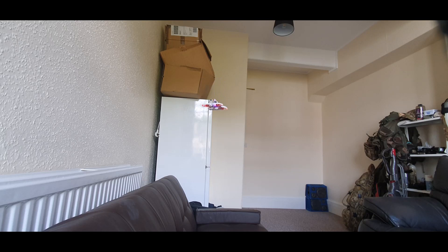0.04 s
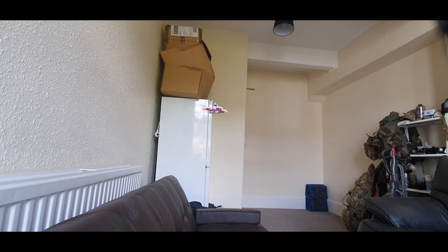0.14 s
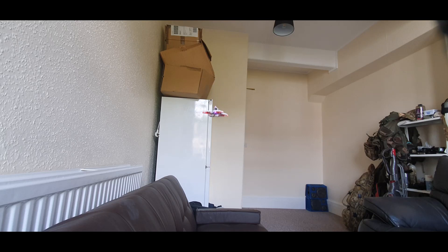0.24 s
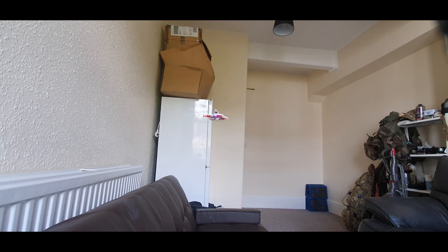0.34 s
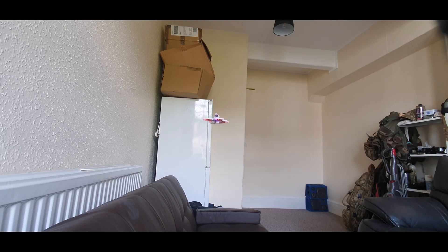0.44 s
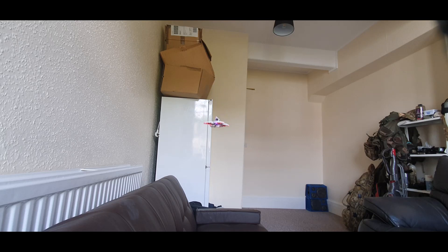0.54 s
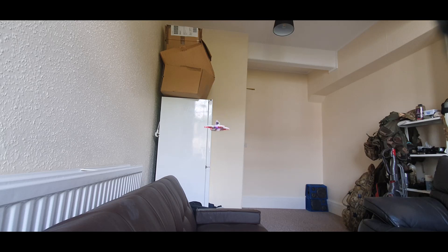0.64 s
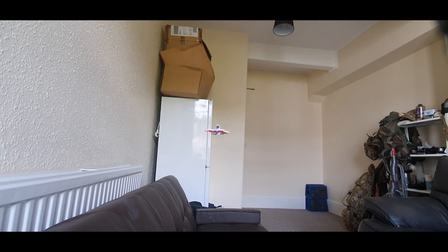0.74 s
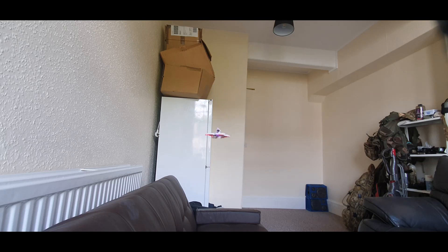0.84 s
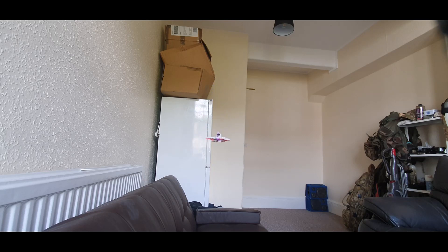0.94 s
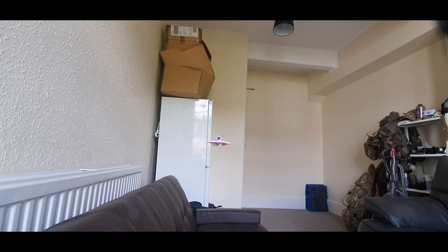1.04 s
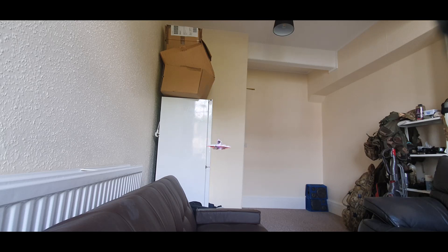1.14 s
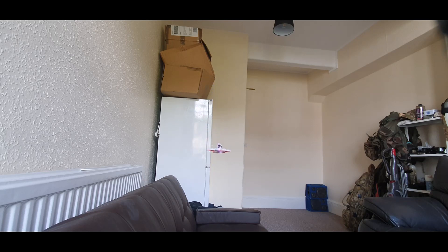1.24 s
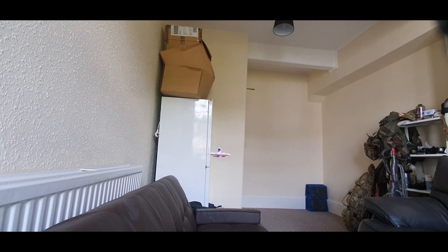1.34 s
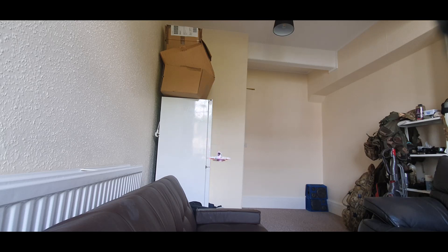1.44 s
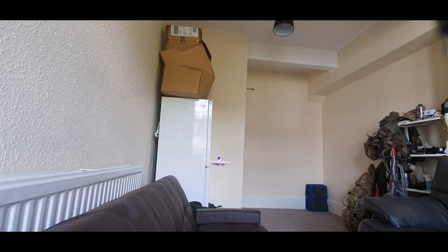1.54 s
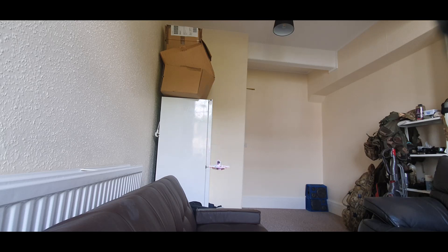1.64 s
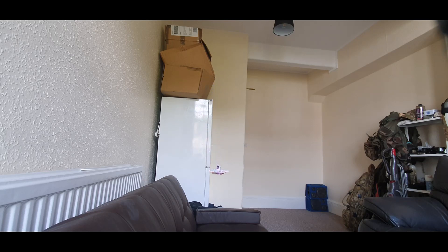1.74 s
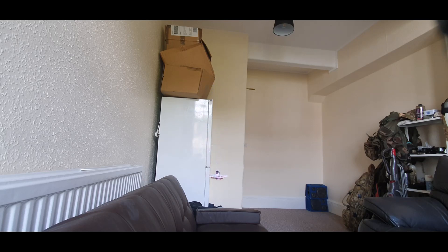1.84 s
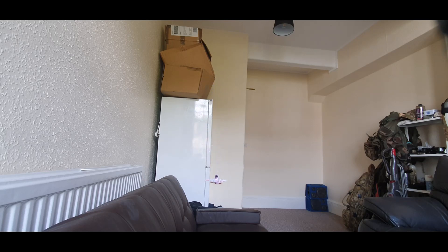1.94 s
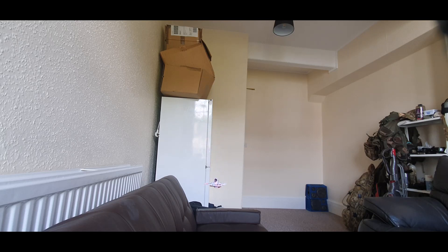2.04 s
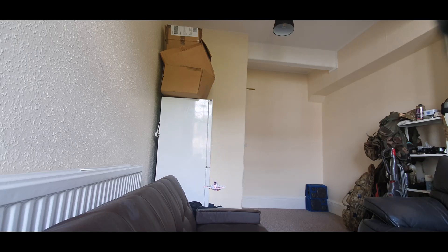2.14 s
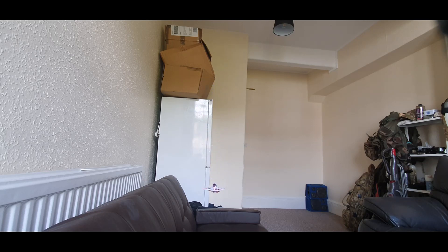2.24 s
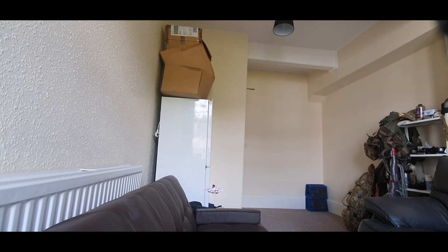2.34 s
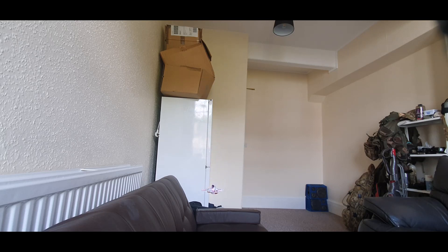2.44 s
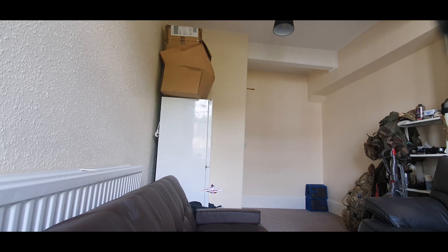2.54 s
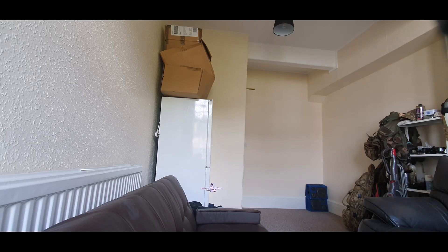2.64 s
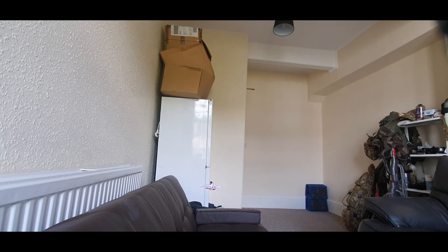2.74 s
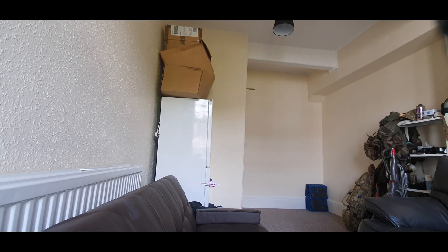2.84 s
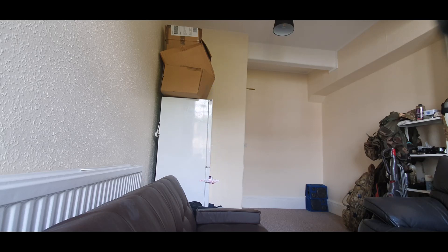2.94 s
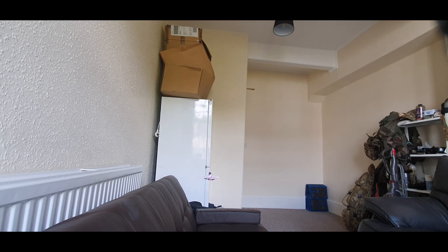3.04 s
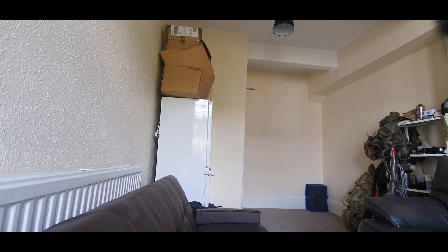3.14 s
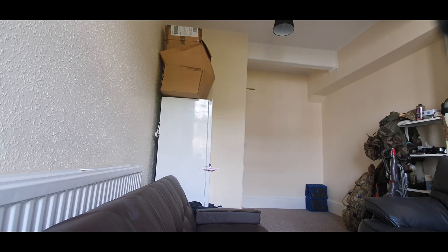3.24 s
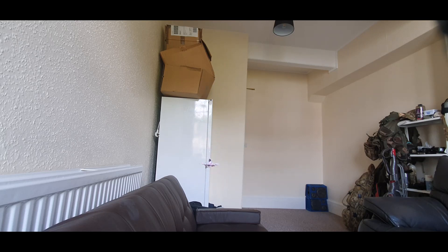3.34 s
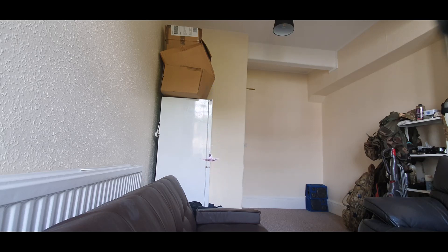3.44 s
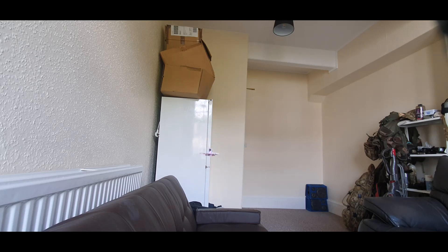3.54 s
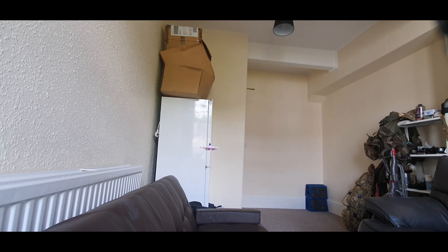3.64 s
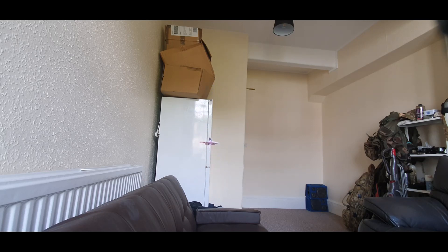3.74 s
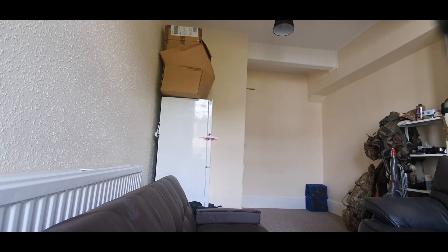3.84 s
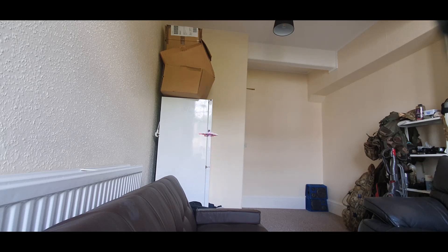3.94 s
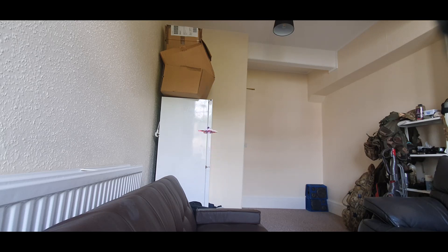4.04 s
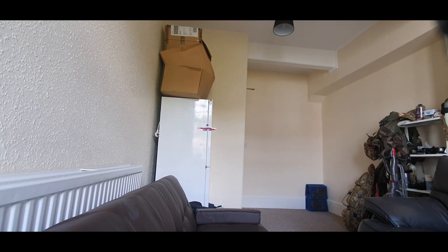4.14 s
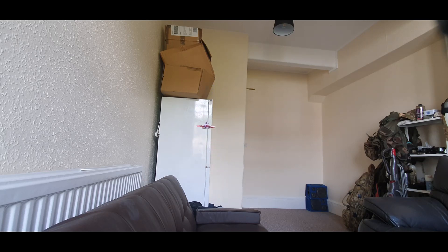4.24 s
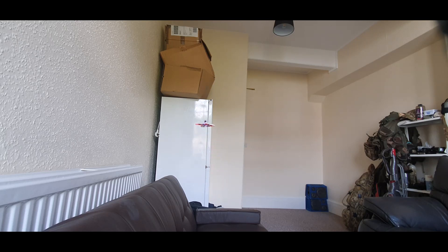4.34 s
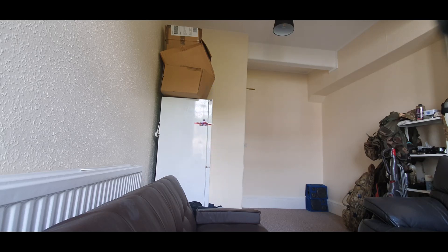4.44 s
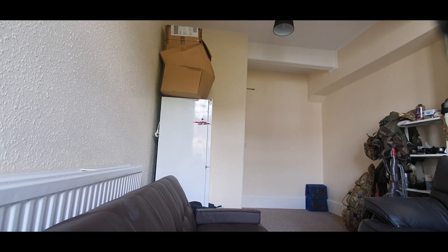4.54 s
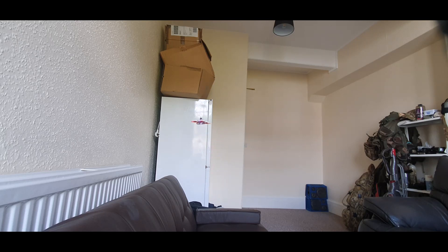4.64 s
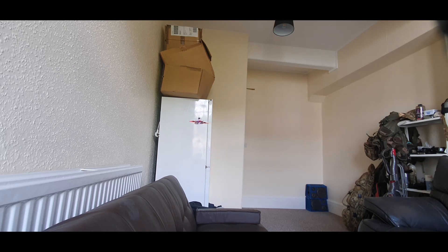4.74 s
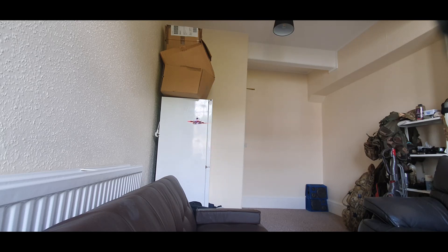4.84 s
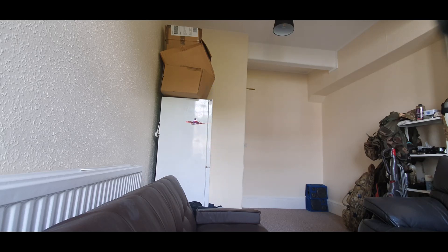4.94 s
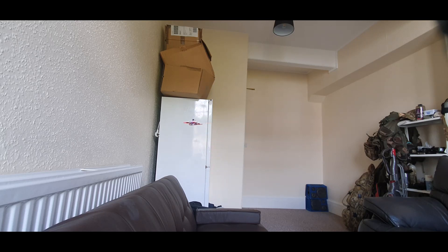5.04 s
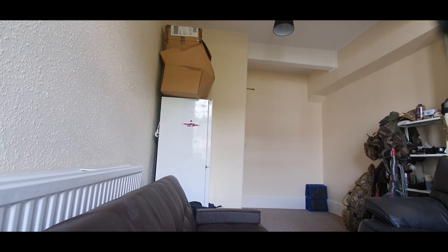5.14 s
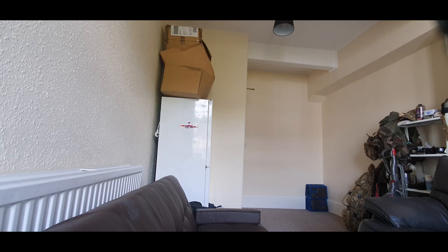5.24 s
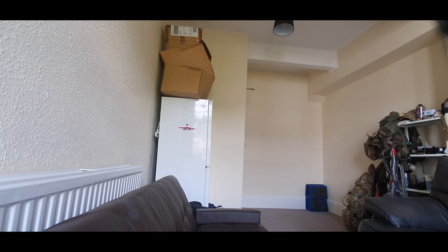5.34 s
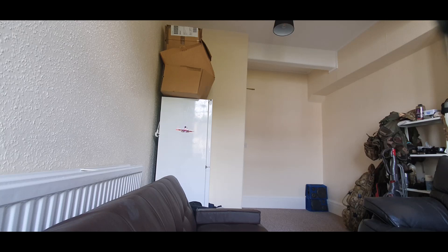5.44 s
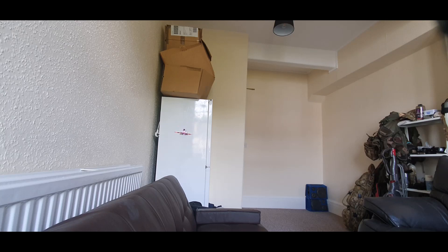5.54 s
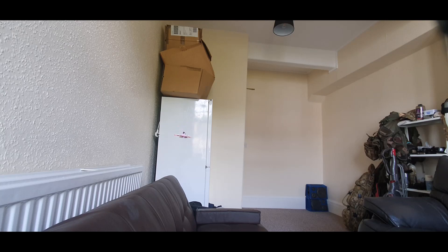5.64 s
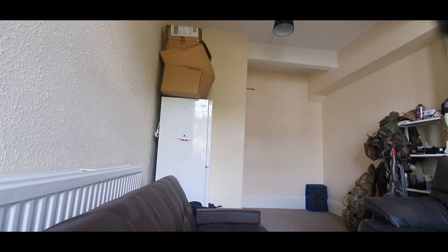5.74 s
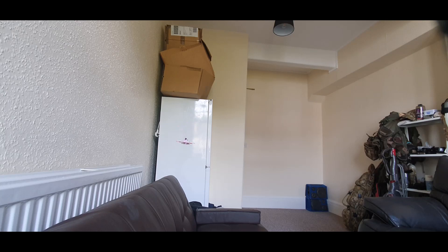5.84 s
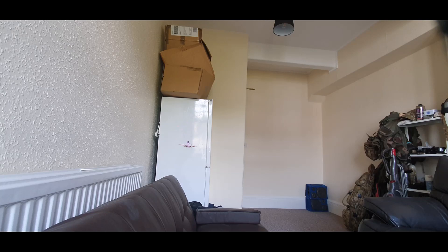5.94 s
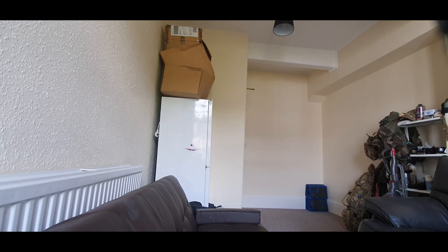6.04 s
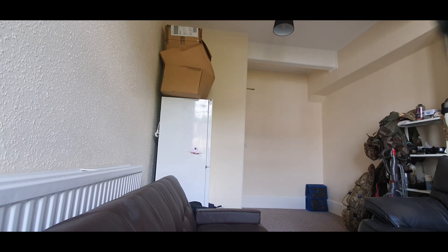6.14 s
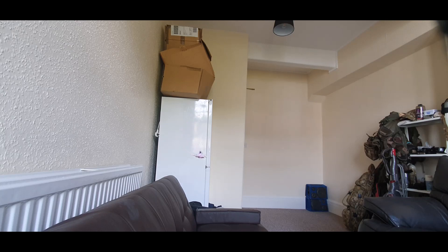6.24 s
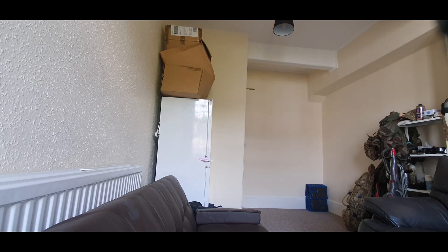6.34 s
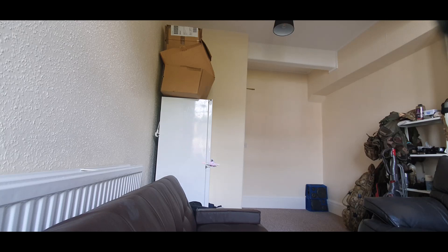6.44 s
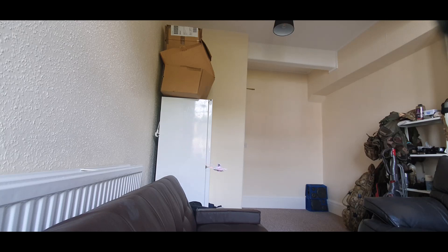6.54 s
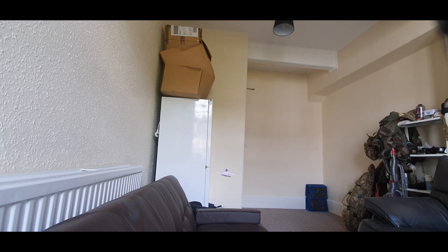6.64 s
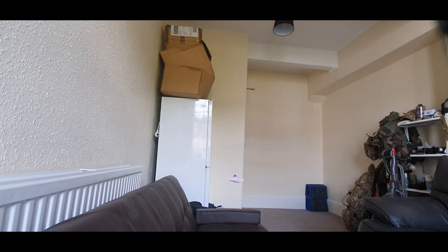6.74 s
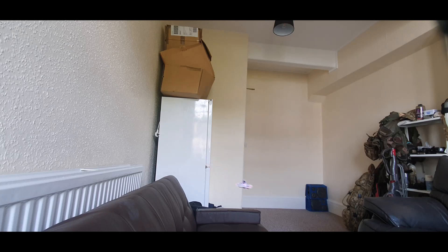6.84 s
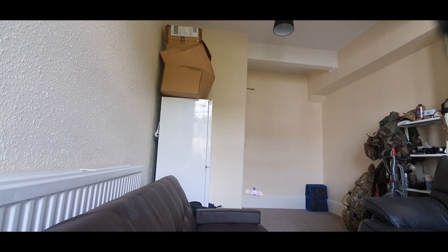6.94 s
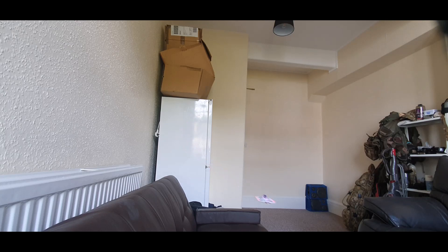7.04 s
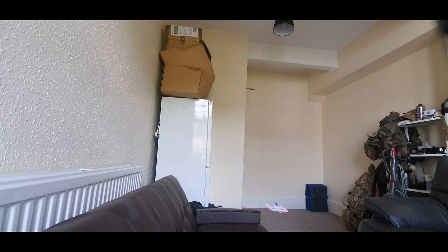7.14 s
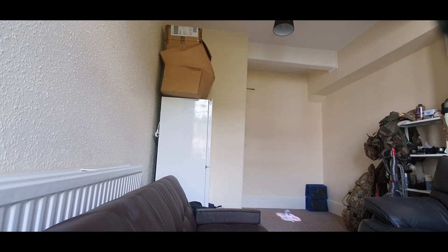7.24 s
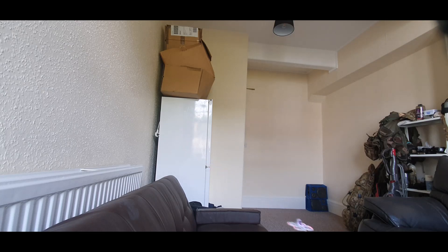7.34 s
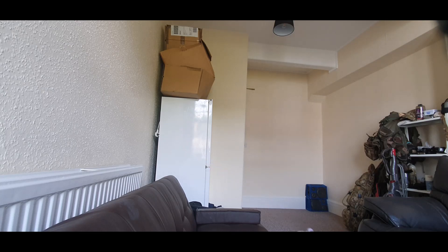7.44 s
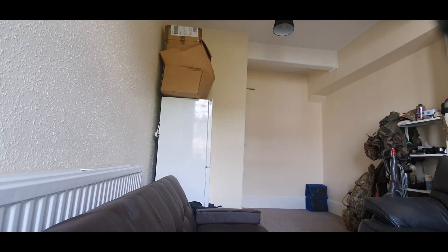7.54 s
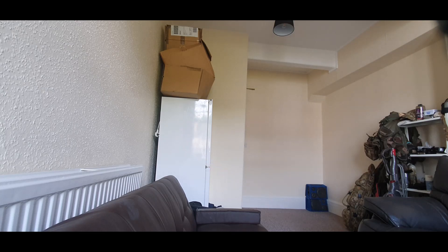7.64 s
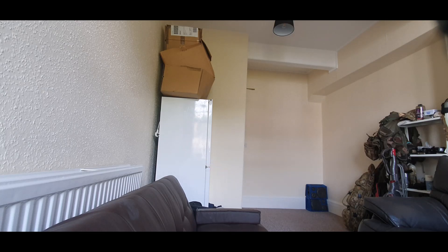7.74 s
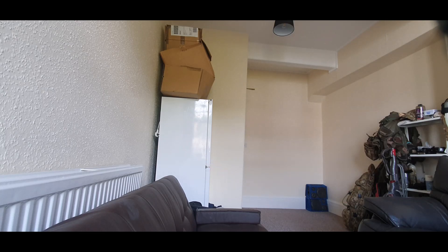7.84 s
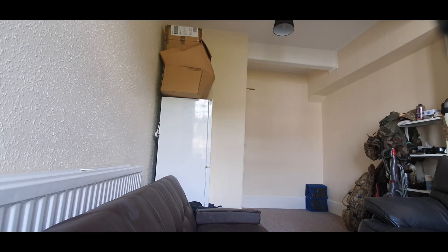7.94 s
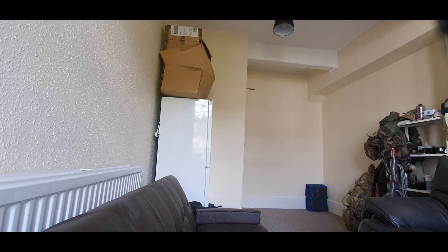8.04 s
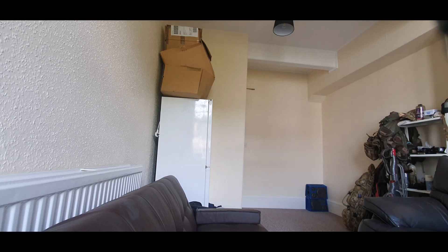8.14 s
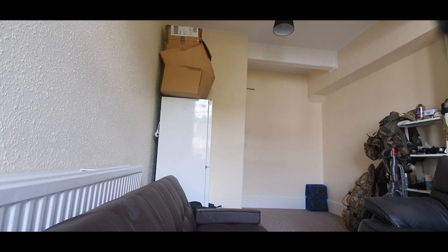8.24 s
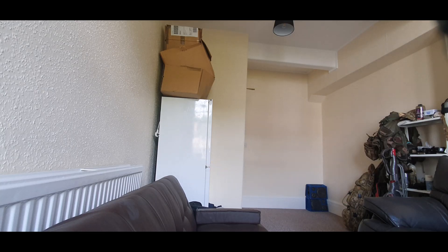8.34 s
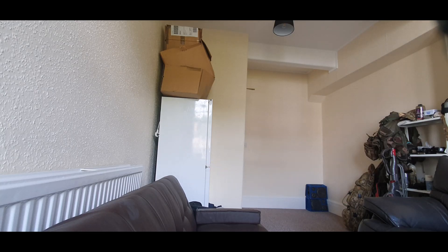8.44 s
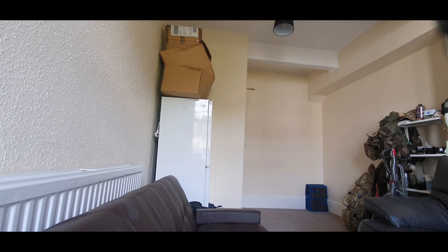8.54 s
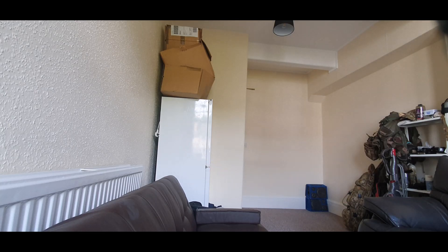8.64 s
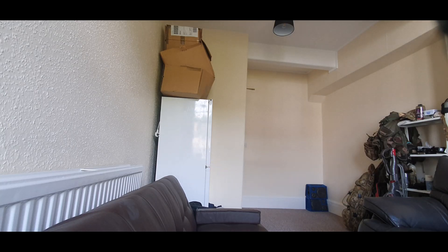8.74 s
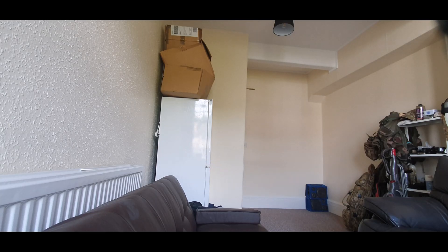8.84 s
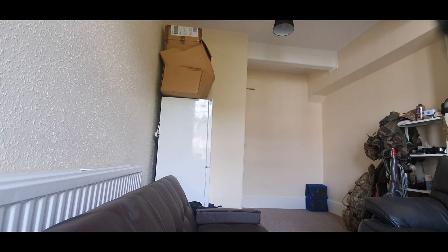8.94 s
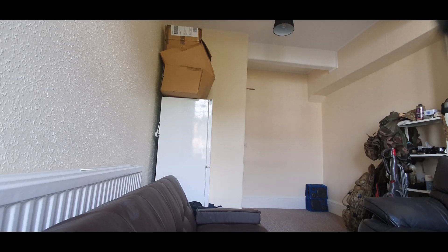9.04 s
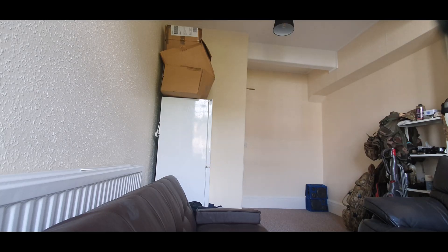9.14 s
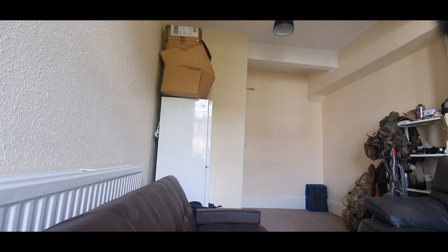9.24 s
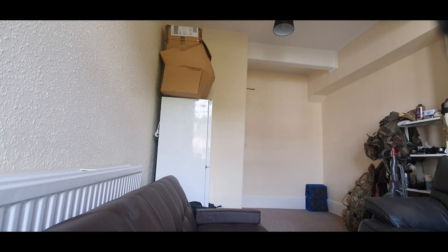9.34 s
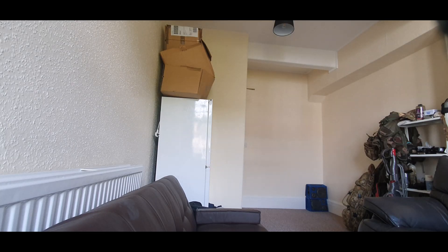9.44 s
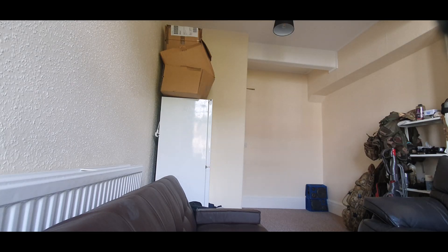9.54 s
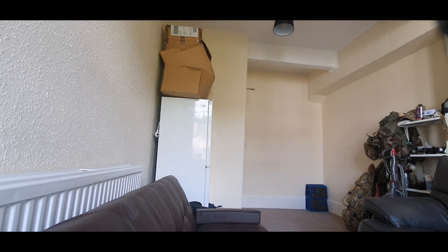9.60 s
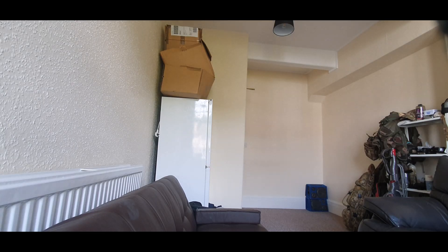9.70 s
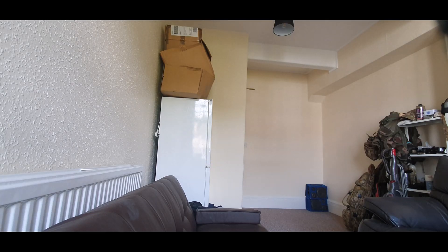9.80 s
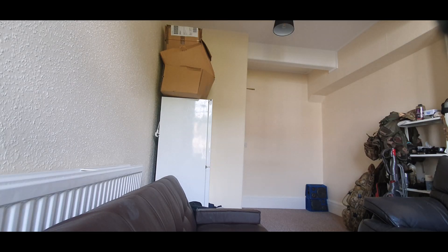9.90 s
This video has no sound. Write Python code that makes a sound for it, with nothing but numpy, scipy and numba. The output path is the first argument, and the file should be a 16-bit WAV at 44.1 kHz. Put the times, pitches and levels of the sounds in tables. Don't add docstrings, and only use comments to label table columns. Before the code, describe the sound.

Buzzing, wavering whine of a small hovering drone with airy hiss, cut off by a soft landing thud, blade scrubbing and a plastic click.

```python
import sys
import numpy as np
from scipy import signal
from scipy.fft import rfft, irfft, next_fast_len
from scipy.io import wavfile
from scipy.ndimage import uniform_filter1d
from numba import njit

SR = 44100
rng = np.random.default_rng(int(sys.argv[2]) if len(sys.argv) > 2 else 0)


def unload_wav(signal):
    wavfile.write(
        sys.argv[1],
        SR,
        np.round(np.clip(np.atleast_2d(signal).T, -1, 1) * 32767).astype(np.int16),
    )


def to_linear_factor(level_db):
    exponent = np.asarray(level_db, float) / 20
    return 10 ** exponent


N = 439677
TIME = np.arange(N) / SR
BLOCK = 64
COARSE_TIME = np.arange(N // BLOCK + 1) * BLOCK / SR
CUT_S = 8.5

# time in seconds, level in dB.
AIR_LEVEL = [
    (0, -32),
    (1.55, -33.5),
    (3.4, -32.5),
    (4.35, -34),
    (7.45, -33),
    (8.5, -35),
    (8.6, -35.5),
    (8.69, -40),
]


def curve(rows, t=TIME, fade_db=600):
    s, db = np.transpose(rows)[:2]
    outside_s = np.maximum(s[0] - t, 0) + np.maximum(t - s[-1], 0)
    return np.interp(t, s, db) - fade_db * outside_s


def bells(rows, scale, t=TIME):
    return sum(scale(db) * np.exp(-((t - s) / half) ** 2) for s, db, half in rows)


def on_log(hz, points):
    f, db = np.transpose(points)
    return np.interp(np.log(hz + 1), np.log(f), db)


def wander(rate, size, per_s):
    k = max(int(per_s / rate), 1)
    w = uniform_filter1d(uniform_filter1d(rng.standard_normal(size), k), k)
    return w / w.std()


def hiss(points, patchy_db=0., alike_hz=300):
    hz, _, z = signal.stft(rng.standard_normal((2, N)), SR, nperseg=1024)
    share = 1 / (1 + (hz[:, None] / alike_hz) ** 2)
    z[1] = share * z[0] + np.sqrt(1 - share ** 2) * z[1]
    patch = uniform_filter1d(wander(12, z.shape, SR / 512), size=24, axis=1)
    z = z * to_linear_factor(on_log(hz, points)[:, None] + patchy_db * patch / patch.std())
    x = signal.istft(z, SR, nperseg=1024)[1][:, :N]
    return x / x.std()


def narrow(hz, width_hz):
    edges = [hz - width_hz / 2, hz + width_hz / 2]
    band = signal.butter(2, edges, "bandpass", fs=SR, output="sos")
    x = signal.sosfilt(band, rng.standard_normal((2, N)))
    return x / x.std()


@njit
def sing(turns, orders, re, im, block):
    out = np.zeros((2, len(turns)))
    for k in range(len(orders)):
        for i in range(len(turns)):
            a = 2 * np.pi * orders[k] * turns[i]
            c, s = np.cos(a), np.sin(a)
            for ear in range(2):
                out[ear, i] += re[k, ear, i // block] * c + im[k, ear, i // block] * s
    return out


def rotor(hz, orders, tones_db, wobble):
    # centre in Hz, width in Hz, peak in dB.
    whine = (11400, 450, 13)
    centre, width, peak_db = whine
    steps, per_s = len(COARSE_TIME), SR / BLOCK
    hunt = .8 * wander(25, steps, per_s) + 1.7 * wander(8, steps, per_s)
    speed = hz * (1 + wobble * np.interp(TIME, COARSE_TIME, hunt))
    turns = (np.cumsum(speed) / SR + rng.random()) % 1
    coarse_hz = np.r_[hz[::BLOCK], hz[-1]][:steps]
    gains = []
    for order, db in zip(orders, tones_db):
        echo = wander(14 + 5 * order, (2, 2, steps), per_s)
        mix = min(.065 * order, .5 + .007 * order)
        slide = min(order / 3, 1.5) ** 1.5 * wander(3, (2, steps), per_s)
        direct = np.exp(1j * slide)
        frame_db = peak_db / (1 + ((order * coarse_hz - centre) / width) ** 2)
        fade_db = (order > 4) * 2.5 * wander(7, steps, per_s)
        path = np.sqrt(1 - mix) * direct + np.sqrt(mix / 2) * (echo[0] + 1j * echo[1])
        gains.append(to_linear_factor(db + frame_db + fade_db) * path)
    gains = np.array(gains)
    return sing(turns, np.array(orders, float), gains.real.copy(), gains.imag.copy(), BLOCK)


def flying_rotors():
    # multiple of the turning speed, level in dB for the fast pair, for the slow pair.
    overtones = [(2, -30, -36), (3, -26, -34), (7, -22, -30), (8, -2.5, -7.5), (10, -15, -22),
                 (12, -8.5, -12), (14, -24, -26), (16, -10, -16), (20, -12, -18), (24, -12, -21),
                 (28, -24, -24), (32, -22, -28), (36, -17, -15)]
    # time in seconds, turning speed in Hz, blade tone in dB.
    fast_a = [(.62, 401.5, -46), (1.125, 387.6, -44), (1.75, 386.5, -41.5), (2.0, 392.3, -38.5),
              (2.3, 388.3, -39.5), (3.05, 391, -39.5), (3.24, 402.7, -36.5), (3.47, 403.6, -38),
              (3.86, 379, -48), (5.0, 387.6, -37), (5.3, 394.8, -47.5), (5.6, 389.3, -37.5),
              (6.25, 399.9, -55), (6.62, 389.4, -48), (6.78, 396.5, -39.5), (7.375, 391.6, -46),
              (7.625, 397.8, -41), (8.0, 383.2, -46.5)]
    fast_b = [(0, 395, -39.5), (.65, 388, -36), (1.001, 379, -47), (1.699, 374.7, -40), (2.15, 388.3, -43),
              (3.05, 391, -44.5), (3.32, 401.6, -41), (3.875, 377.8, -36.5), (4.499, 374.5, -45.5),
              (5.1, 380, -44), (5.501, 390.4, -44.5), (6.0, 386.6, -37), (6.5, 378.2, -42),
              (6.751, 383.4, -42.5), (7.15, 371, -34.5), (7.7, 371, -49), (8.101, 365.8, -46),
              (8.35, 370.5, -49.5)]
    slow_a = [(.25, 316.4, -45), (.75, 321.6, -43.5), (1.701, 348.4, -50.5), (2.251, 361.8, -41),
              (2.6, 358.7, -36.5), (2.95, 358.7, -41.5), (3.281, 341, -43), (3.53, 348.5, -43.5),
              (4.001, 341, -53), (4.65, 342, -46), (5.375, 328.4, -52), (5.949, 329.5, -48),
              (6.52, 342.8, -42.5), (6.8, 334.8, -41), (7.349, 338.5, -48), (7.625, 335, -51),
              (8.1, 346, -47), (8.4, 340.2, -51)]
    slow_b = [(0.551, 316, -55), (1.199, 325, -57.5), (1.7, 327.5, -43.5), (2.12, 352.1, -39.5),
              (2.4, 353, -45), (3.0, 347, -46), (3.375, 330.9, -47.5), (4.05, 329, -48), (4.3, 323.3, -52),
              (5.0, 326.3, -50.5), (5.45, 323.2, -46.5), (5.9, 309, -47), (6.3, 308, -52),
              (6.6, 315.7, -41), (6.801, 311.5, -47), (7.18, 320.8, -46.5), (7.58, 314.1, -47),
              (8.0, 331.5, -48)]
    # steady level in dB, fast pair then slow pair.
    hum_level = (-58.5, -66.5)
    # time in seconds, change in dB, half length in seconds.
    hum_spots = [
        [(1.1, -6, 0.21), (2.05, -8.5, 0.081), (3.26, -5.5, 0.042), (6.55, -10.5, .25), (7.2, 4, 0.3006), (7.72, -6, .1), (8.55, -14, 0.098)],
        [(0, 8, 0.31), (.73, -10, .06), (3.45, -20, 0.24), (4.4, 4.5, 0.69), (6.6, -14, 0.22), (7.92, -22, 0.087), (8.6, 12.5, 0.061)],
    ]
    bright_db = (1.5, -2, -1.5, 1.5)
    die_db_per_s = (500, 500, 70, 90)

    t = COARSE_TIME
    orders, fast_db, slow_db = np.transpose(overtones)
    landing = np.clip((TIME - CUT_S) / .17, 0, 1)
    wobble = .0014 + .012 * landing
    stall_s = AIR_LEVEL[-1][0]
    near_db = np.interp(t, *np.transpose(AIR_LEVEL)) - AIR_LEVEL[2][1]
    tones = 0
    for k, rows in enumerate((fast_a, fast_b, slow_a, slow_b)):
        s, hz, db = np.transpose(rows)
        pair = k // 2
        cut_db = -die_db_per_s[k] * np.maximum(t - CUT_S - .005, 0) - 900 * np.maximum(t - stall_s, 0)
        hum_db = hum_level[pair] + bells(hum_spots[pair], float, t) - 500 * np.maximum(t - 8.62, 0)
        blade_db = np.interp(t, s, db) + 3.5 + cut_db
        over_db = [-39 + bright_db[k] + level + cut_db + near_db for level in (fast_db, slow_db)[pair]]
        speed = np.interp(TIME, s, hz) * (1 - .17 * landing)
        tones = tones + rotor(speed, [1, 4, *np.round(orders)], [hum_db, blade_db, *over_db], wobble)
    return tones


def air_hiss():
    # frequency in Hz, level in dB per Hz.
    air_colour = [(120, -25.5), (240, -24.5), (420, -15.5), (570, -19), (740, -12.5), (930, -15.5),
                  (1250, -5.5), (1750, -3), (2150, -6), (2900, -1.5), (4200, -2.5), (7000, -7), (11300, -1),
                  (15700, -8.5)]
    return to_linear_factor(curve(AIR_LEVEL, fade_db=350)) * hiss(air_colour, patchy_db=0.98)


def building_boom():
    # time in seconds, peak in dB, half length in seconds.
    swells = [(0, -62, 0.066), (.45, -59, 0.36), (1.1, -60, 0.19), (1.52, -50.5, 0.26), (2.45, -73, 0.41),
              (3.2, -65, .3), (3.6, -67, 0.088), (4.12, -67, 0.078), (4.47, -66, 0.073), (5.55, -75, 0.16),
              (6.65, -75, 0.05), (7.35, -76, 0.13), (7.8, -78, 0.076)]
    hum = narrow(65.0, 18.2) + to_linear_factor(-19) * narrow(178, 28.2) + to_linear_factor(-19.5) * narrow(33, 11)
    return (to_linear_factor(-81) + bells(swells, to_linear_factor)) * (hum[0] + .35 * hum)


def quiet_room():
    # frequency in Hz, level in dB per Hz.
    quiet_colour = [(18, -48.5), (30, -21), (54, -3), (124, -25), (182, -4), (274, -22), (344, -17.5),
                    (1750, -13.5), (3130, -21.5), (3940, -12.5), (13000, -41.5)]
    return to_linear_factor(-72.5) * hiss(quiet_colour + [(15600, -56)], patchy_db=5.5)


def cushion_chew():
    # time in seconds, peak in dB, half length in seconds.
    chews = [
        (8.55, -40.5, 0.034),
        (8.63, -44, 0.068),
    ]
    # centre in Hz, width in Hz, level in dB.
    chew_bands = [(1256, 270, -2), (2480, 750, -0.5), (3736, 1100, -3.5)]
    noise = sum(to_linear_factor(db) * narrow(hz, width) for hz, width, db in chew_bands)
    return bells(chews, to_linear_factor) * noise


def landing_thuds():
    # time in seconds, peak in dB.
    bounces = [
        (8.586, -39),
        (8.763, -43.5),
    ]
    # frequency in Hz, level in dB, seconds to fall by 60 dB.
    floor_modes = [(60.8, 1, 0.55), (121.8, -6.5, 0.3), (176, 0, 0.14), (307, -15, 0.21)]
    out = 0
    for s, db in bounces:
        t = np.maximum(TIME - s, 0)
        ring = 0
        for f, mode_db, t60 in floor_modes:
            ring = ring + to_linear_factor(mode_db) * np.exp(-np.log(1000) * t / t60) * np.sin(2 * np.pi * f * t)
        out = out + to_linear_factor(db) * (1 - np.exp(-t / 0.005)) * ring
    return out


def coasting_rotor():
    # time in seconds, turning speed in Hz, tone level in dB.
    run_down = [
        (8.66, 290, -85),
        (8.8, 272, -66),
        (9.0, 254, -61),
        (9.1, 226, -60),
        (9.2, 207, -57),
        (9.3, 199, -57),
        (9.33, 190, -90),
    ]
    # multiple of the turning speed, level in dB.
    coast_tones = [(4, -7), (12, 0), (16, -8), (36, 1)]
    s, hz, db = np.transpose(run_down)
    orders, order_db = np.transpose(coast_tones)
    level_db = curve(np.c_[s, db], COARSE_TIME)
    return rotor(np.interp(TIME, s, hz), np.round(orders), [level_db + g for g in order_db], .005)


def motor_shells():
    # frequency in Hz, width in Hz.
    shell_modes = [
        (7250, 106),
        (5100, 32),
        (5160, 31),
    ]
    # time in seconds, peak in dB, half length in seconds.
    high_bursts = [(8.7, -50, 0.035), (8.88, -57, 0.23), (9.255, -49, 0.049)]
    low_bursts = [(8.9, -65, 0.13), (9.108, -54.5, .03), (9.23, -57, .06), (9.35, -55, 0.066),
                  (9.44, -59, 0.046), (9.52, -71, 0.042)]
    high, *pair = (narrow(*mode) for mode in shell_modes)
    return bells(high_bursts, to_linear_factor) * high + bells(low_bursts, to_linear_factor) * sum(pair)


def cloth_scrub():
    # time in seconds, level in dB.
    scrub_level = [
        (8.72, -47),
        (9.02, -45.5),
        (9.14, -51.5),
        (9.29, -54.5),
    ]
    # frequency in Hz, level in dB per Hz.
    scrub_colour = [(120, -57), (200, -35), (824, -9), (1100, -17), (1720, -8.5), (4770, -8.5), (5040, -13),
                    (6470, -16), (7340, -11), (14500, -23)]
    rough_db = 1.2 * wander(56, N, SR)
    return to_linear_factor(curve(scrub_level) + rough_db) * hiss(scrub_colour, patchy_db=3.0)


def click():
    # time in seconds, peak in dB, centre in Hz, length in seconds.
    knocks = [
        (9.3061, -20, 8500, .003),
        (9.3103, -20, 1900, .007),
        (9.3106, -21, 9500, .003),
    ]
    # frequency in Hz, level in dB per Hz.
    tail_colour = [(120, -41), (200, -13.5), (353, -43), (380, -7), (601, -13.5), (1940, -5.5), (4680, -17),
                   (5130, -12), (5420, -18), (16000, -19.5)]
    out = 0
    for s, db, hz, length in knocks:
        t = TIME - s
        out = out + to_linear_factor(db) / 3 * (t > 0) * np.exp(-np.abs(t) / length) * narrow(hz, hz)
    t = np.maximum(TIME - knocks[1][0], 0)
    tail = to_linear_factor(-33 - 60 * t / 0.37)
    return out + (1 - np.exp(-t / 0.0037)) * tail * hiss(tail_colour, patchy_db=0.0)


def cloth_rustle():
    # time in seconds, peak in dB, half length in seconds.
    rustles = [(9.62, -74, 0.054), (9.85, -68.5, 0.059), (9.92, -69, .06)]
    # frequency in Hz, level in dB per Hz.
    rustle_colour = [(300, -10), (700, -21), (1850, -11), (2800, -18), (3900, -10), (7400, -35),
                     (11300, -13.5), (15500, -40)]
    return bells(rustles, to_linear_factor) * hiss(rustle_colour, patchy_db=3.0)


def scene():
    flight = flying_rotors() + air_hiss()
    room = building_boom() + quiet_room()
    landing = cushion_chew() + landing_thuds() + cloth_scrub()
    return flight + room + landing + coasting_rotor() + motor_shells() + click() + cloth_rustle()


def thin_weak_sounds(x):
    # frequency in Hz, level in dB.
    weakest = [(100, -54.5), (240, -47), (570, -41.5), (740, -42), (930, -40), (1400, -32.5), (1720, -31),
               (1950, -36.5), (2150, -34.5), (2500, -55), (8000, -37.5), (11000, -49), (15700, -39)]
    hz, _, z = signal.stft(x, SR, nperseg=2048)
    loud = np.sqrt((np.abs(z) ** 2).sum(axis=1, keepdims=True)) + 1e-9
    loud = loud * np.minimum(loud / to_linear_factor(-40), 1)
    drift = uniform_filter1d(wander(6, z.shape[1:], SR / 1024), size=5, axis=0)
    limit = loud * to_linear_factor(on_log(hz, weakest)[:, None] + 4.5 * drift / drift.std())
    z = np.where(np.abs(z) < limit, .04 * z, z)
    return signal.istft(z, SR, nperseg=2048)[1][:, :N]


def band_limit(x):
    return signal.sosfilt(signal.butter(12, 17030, fs=SR, output="sos"), x)


def record(dry):
    # frequency in Hz, difference in dB.
    left_over_right = [(60, -2.5), (150, 7.5), (300, 3.5), (700, 7.5), (1400, 5.5), (2800, 6.5),
                       (6000, 11.5), (8800, 8.5), (11000, -1.5), (14000, 8.5)]
    size = next_fast_len(N + SR)
    hz = np.arange(size // 2 + 1) * SR / size
    tilt_db = on_log(hz, left_over_right)
    ears = to_linear_factor(np.array([tilt_db, -tilt_db]) / 2)
    top_cut = np.clip((15720 - hz) / 50 + .5, 0, 1) ** 2
    x = irfft(rfft(dry, size) * ears * top_cut, size)[:, :N]
    mix = thin_weak_sounds(x)
    return band_limit(mix)


dry = scene()
out = record(dry)
unload_wav(out)
```